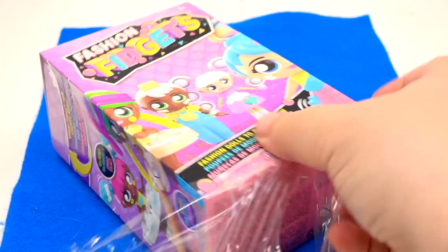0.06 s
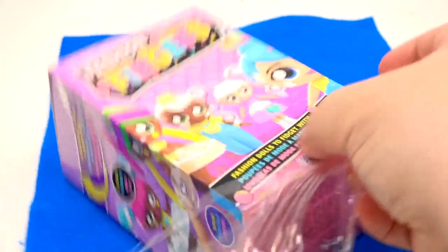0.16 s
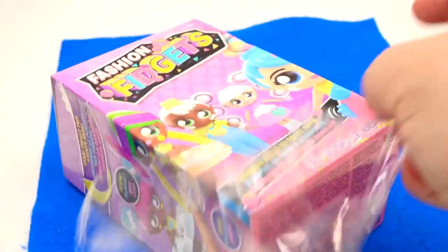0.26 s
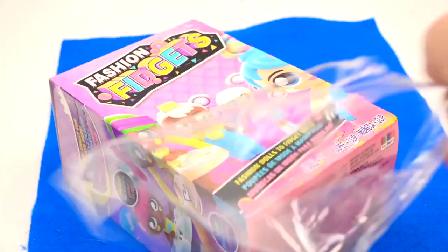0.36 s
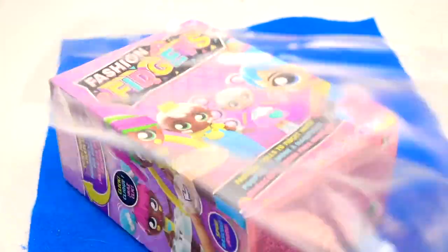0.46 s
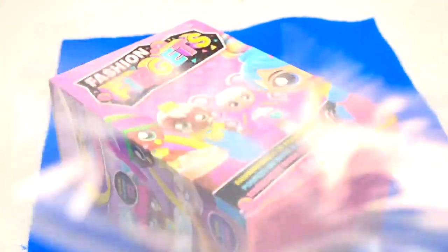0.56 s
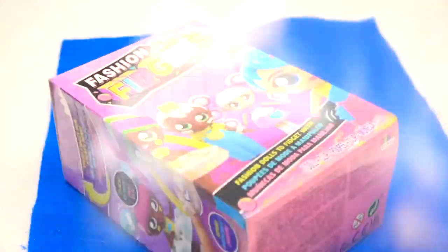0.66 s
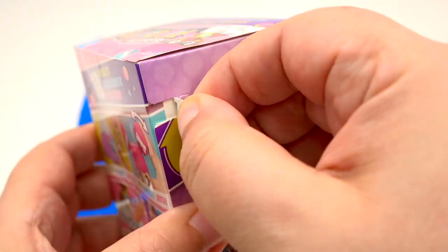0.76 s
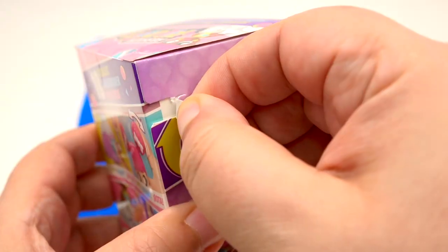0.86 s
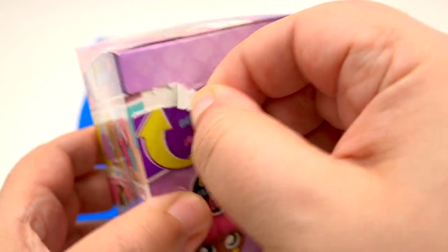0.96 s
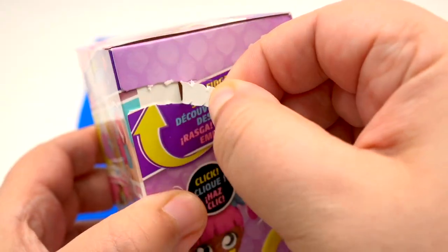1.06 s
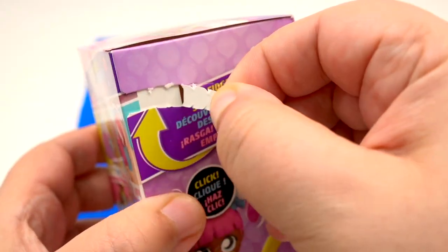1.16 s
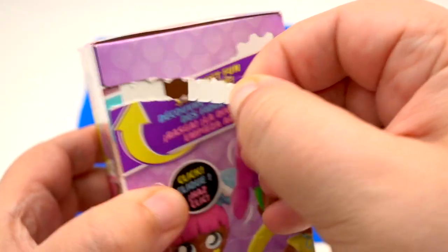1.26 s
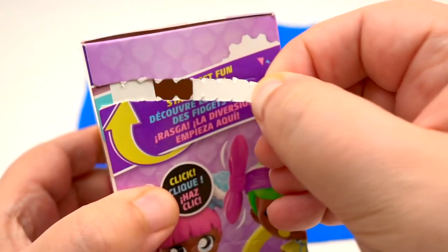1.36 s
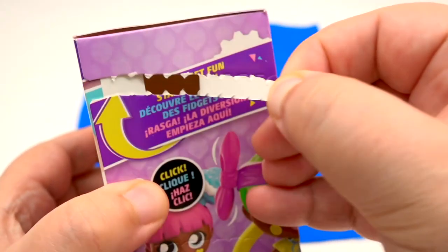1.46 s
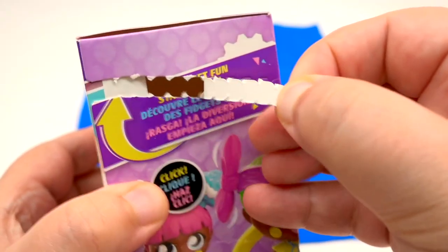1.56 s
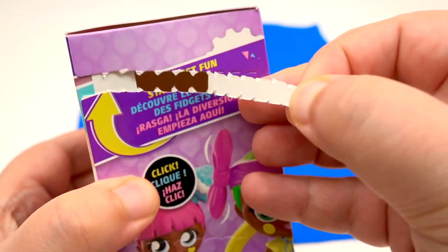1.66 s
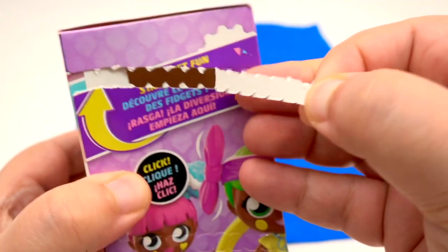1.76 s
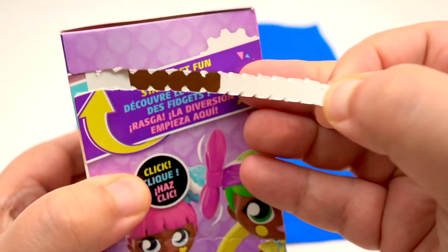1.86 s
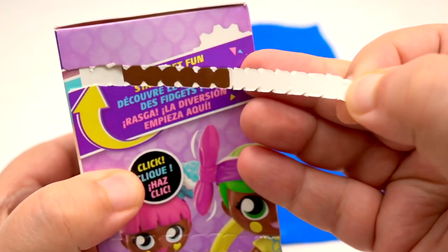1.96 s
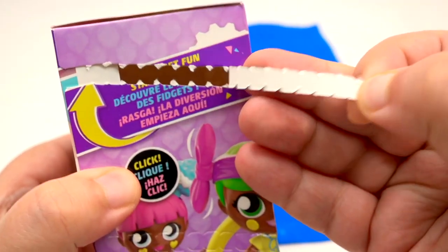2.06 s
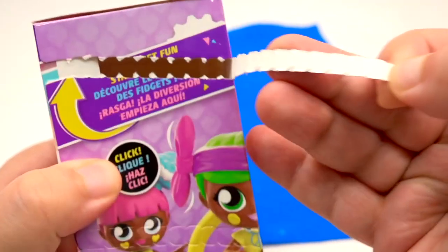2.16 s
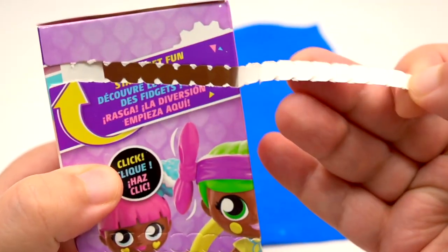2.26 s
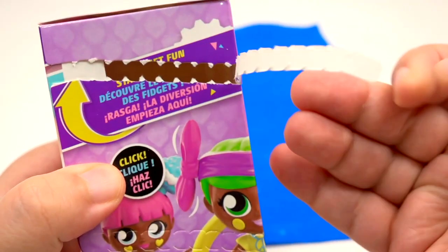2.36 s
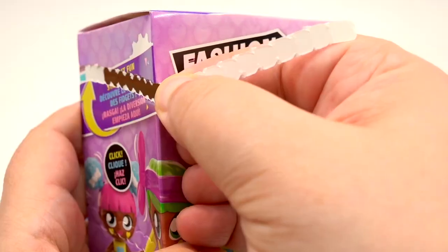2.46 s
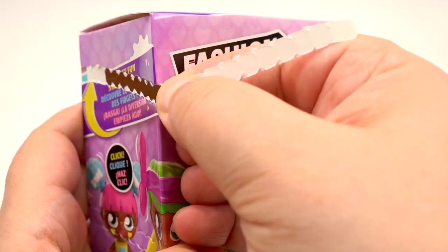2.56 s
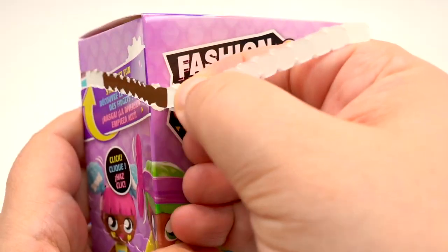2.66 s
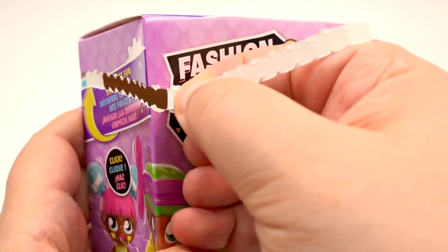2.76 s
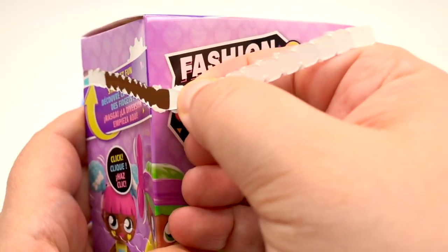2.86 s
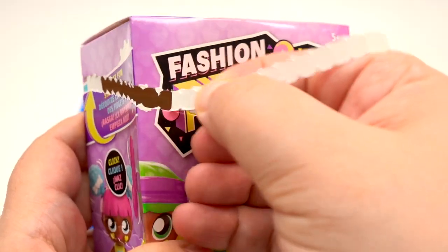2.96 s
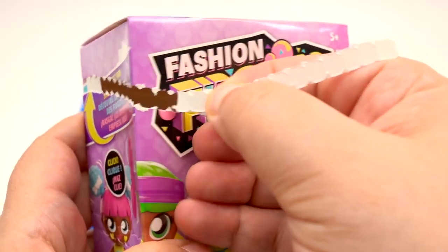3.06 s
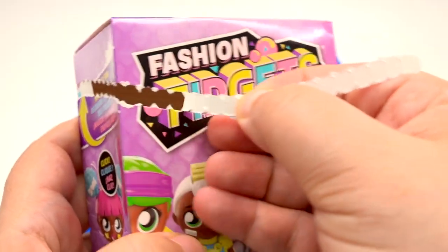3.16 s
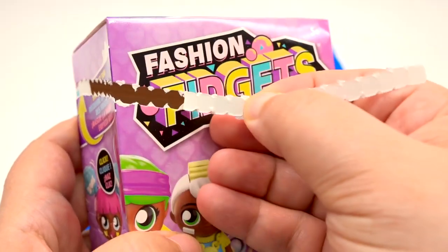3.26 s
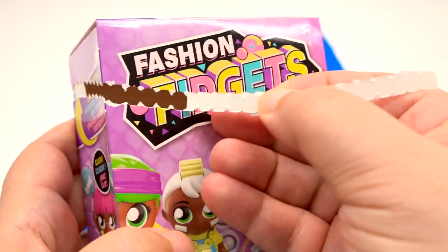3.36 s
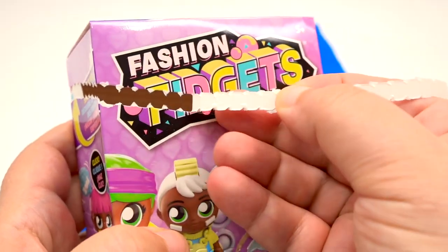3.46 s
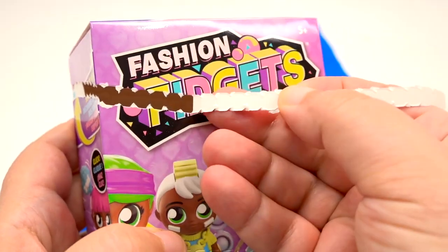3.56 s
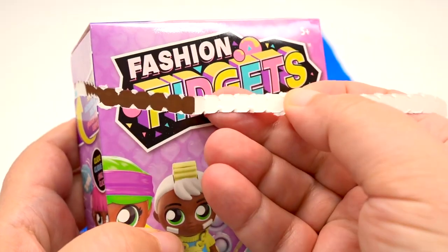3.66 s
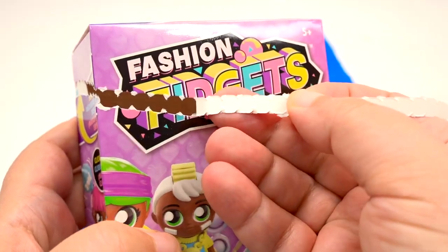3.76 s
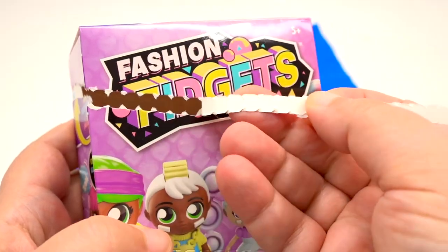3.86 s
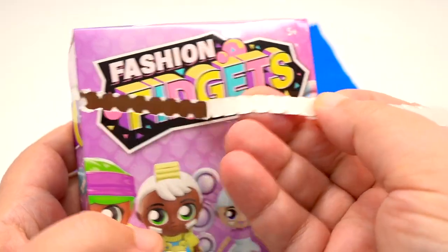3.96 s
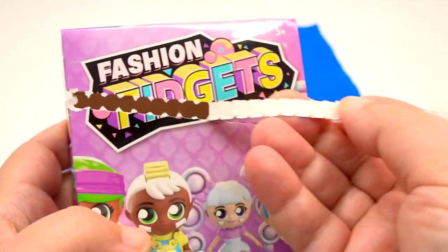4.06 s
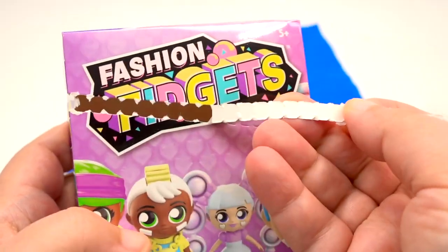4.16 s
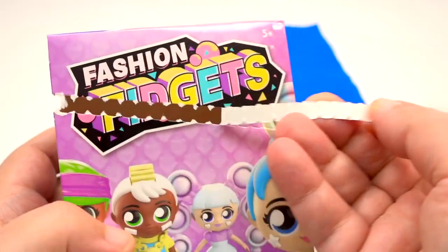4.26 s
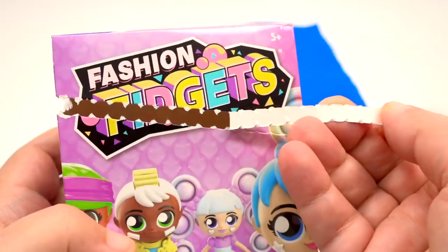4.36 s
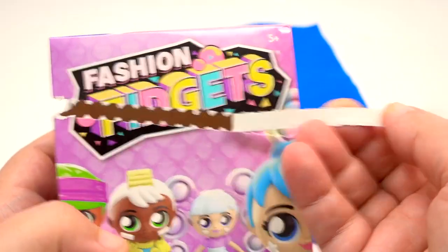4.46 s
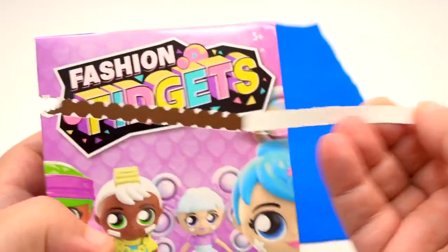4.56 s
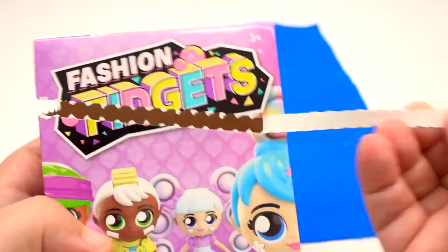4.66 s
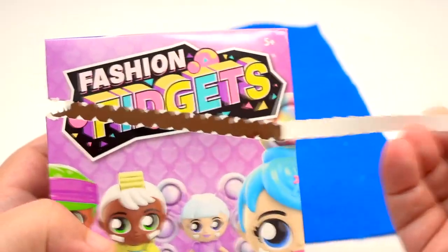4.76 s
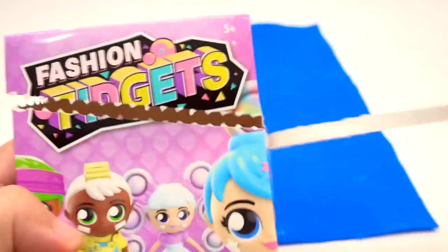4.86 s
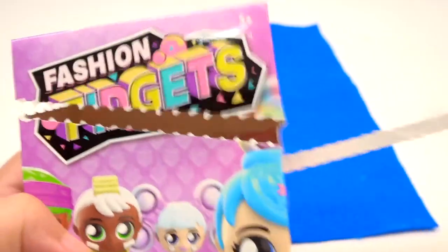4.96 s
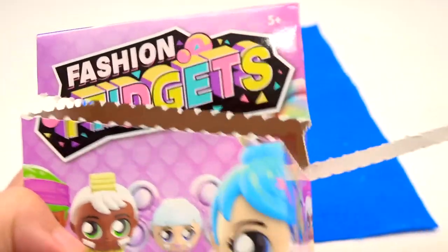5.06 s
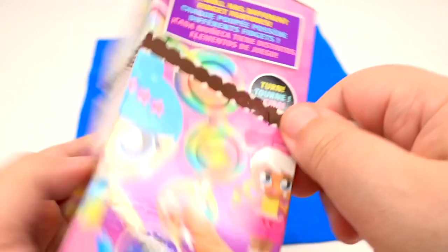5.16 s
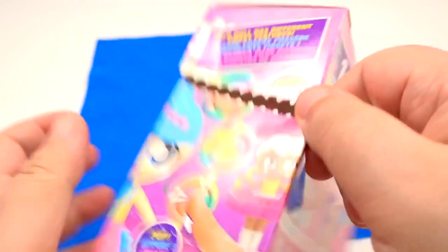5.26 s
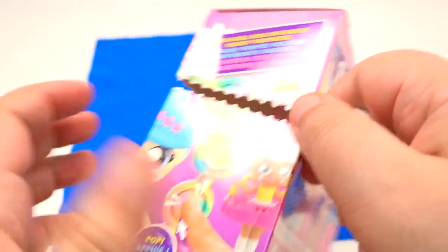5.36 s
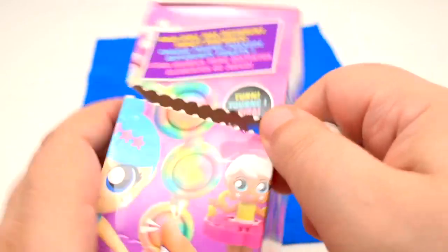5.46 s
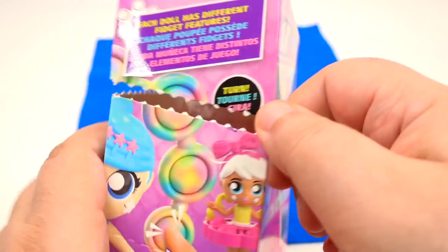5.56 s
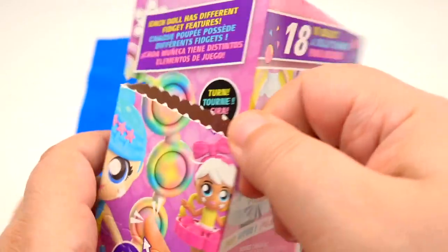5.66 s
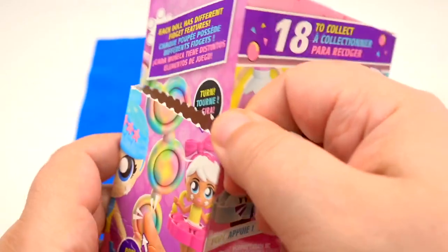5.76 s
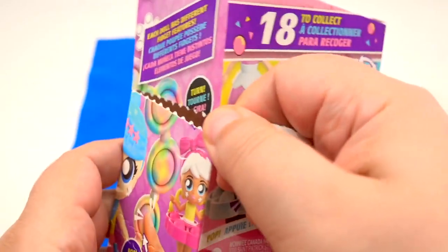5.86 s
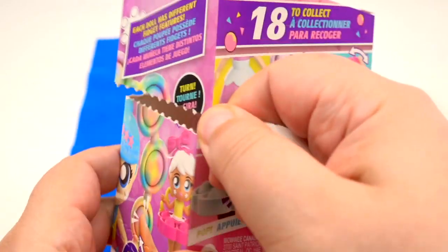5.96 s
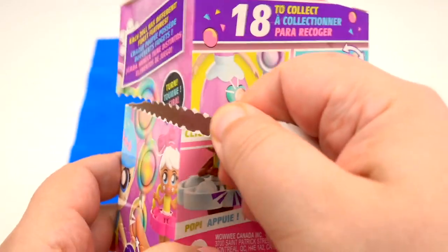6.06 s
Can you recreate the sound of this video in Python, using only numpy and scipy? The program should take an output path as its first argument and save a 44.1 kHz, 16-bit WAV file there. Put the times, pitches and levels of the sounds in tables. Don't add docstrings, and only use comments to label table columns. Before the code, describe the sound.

Close, detailed stereo in a small quiet room, with soft air hush and a low distant fan hum. From 0 to 0.75 seconds thin plastic film slides and crinkles brightly, its creases popping, with a harder burst near 0.6. From 0.8 to 2.15 a perforated card strip is pulled: separate sharp snaps, uneven in spacing, each ringing the small box's panels and hollow, with fibre crackle and brief twangs of the freed strip. A lull with a faint shift and knock follows until a short rub and snaps at 2.6. Tearing resumes around 2.9 to 3.4, pauses, then continues from 3.7 in firmer, boxier cracks. At 4.7 to 4.95 the snaps merge into a fast, resonant rip. A hollow knock lands near 5.3 as the box turns, then light finger slides and rustles, quieter. From 5.9 to about 6.1 a last few crisp snaps break out.

```python
import sys
import numpy as np
from scipy import signal
from scipy.fft import rfft, irfft, next_fast_len
from scipy.io import wavfile
from scipy.ndimage import uniform_filter1d, minimum_filter1d, map_coordinates

SR = 44100
rng = np.random.default_rng(int(sys.argv[2]) if len(sys.argv) > 2 else 0)


def attenuation_scalar(level_db):
    decades = np.asarray(level_db, float) / 20
    return 10 ** decades


def output_pcm(signal):
    pcm = np.clip(np.atleast_2d(signal).T, -1, 1) * 32767
    wavfile.write(sys.argv[1], SR, np.round(pcm).astype(np.int16))


N = 269892

# frequency in Hz, level in dB per Hz.
AIR_COLOUR = [(13, -45), (22, -5), (48, -8.5), (130, -1), (207, 1.5), (332, -4), (476, -9), (1060, -6.5),
              (2310, -23.5), (5160, -24.5), (6430, -40), (14000, -32), (15200, -44), (16500, -70)]
# frequency in Hz, width in Hz, level in dB.
FAN_HUM = (124.2, 19.4, -50.5)
AIR_DB, SWAY_DB = -50.5, 2.5
QUIET_DB, QUIET_ENDS_S = -8, .6

# frequency in Hz, level in dB per Hz.
FILM_COLOUR = [(530, -16), (900, -10), (1160, -8), (1670, 0), (5320, 1.5), (7950, -4), (10400, -12.5),
               (15000, -16), (15900, -24), (16500, -52)]
# frequency in Hz, level in dB per Hz.
FIBRE_COLOUR = [(880, -18), (1500, -9.5), (2050, -10.5), (3180, -10.5), (7250, -17), (8510, -18.5),
                (10800, -30), (15750, -31.5), (16050, -65), (16500, -79)]
# frequency in Hz, level in dB per Hz.
TICK_COLOUR = [(2500, -24), (4500, -3), (6500, 3), (9500, 3), (11000, -25), (15700, -20), (16200, -60)]
# frequency in Hz, width in Hz, level in dB.
PANEL_MODES = [(660, 130, 4), (880, 106, 7), (1020, 88, 3), (1200, 78, 2), (1368, 80, 1.5), (1533, 90, 1),
               (1680, 120, 0.5)]
# frequency in Hz, width in Hz, level in dB.
HOLLOW_MODES = [(205, 380, -27), (264, 57.6, -0.5), (348, 51, 3), (450, 63, 2)]
# frequency in Hz, width in Hz, level in dB.
LID_MODES = [(1550, 100, 2), (3600, 850, -6)]
LID_DB, LID_LOOSE_S = 4, 5.975

# time in seconds, crackle in dB.
FILM_SLIDE = [
    (.017, -40),
    (.03, -30.5),
    (.16, -35),
    (.2, -32),
    (.41, -25.5),
    (.51, -34.5),
    (.59, -45),
    (.63, -19),
    (.78, -47),
]
FILM_GONE_S, FILM_PANEL_DB, FILM_HOLLOW_DB = .78, -13.5, -19
# start in seconds, crack peak in dB, length in ms.
CREASE_POPS = [(0.0247, -20.5, 5.5), (0.04, -12, 3), (0.0954, -25.5, 4.1), (0.13, -23.5, 2.7),
               (.1371, -28, 3.1), (0.1705, -25, 5.8), (0.179, -20, 3), (0.1967, -22.5, 4.3),
               (.2155, -26, 2), (0.2318, -30, 6), (0.2422, -14, 1.6), (0.2982, -20, 1.2), (.3085, -30, 2.5),
               (0.0328, -23, 1.5), (0.051, -24, 2), (.271, -27, 3), (.362, -25, 4.5), (.38, -24, 5.7),
               (.417, -21, 3.8), (0.426, -30, 4), (0.4627, -25, 3.2), (0.326, -32, 2.9), (0.3919, -19, 8.5),
               (0.4044, -18.5, 13), (0.442, -40, 2), (0.467, -21, 1.3), (0.4829, -19.5, 5.3),
               (0.4945, -20, 1.5), (0.541, -26.5, 6.5), (0.603, -19, 6.5), (.618, -15.5, 1.9),
               (0.623, -23, 8.3), (.633, -9.5, 2.3), (0.7178, -26, 3.9)]
POP_PANEL_DB, POP_HOLLOW_DB = -12, -44

# start in seconds, peak in dB, pitch in Hz.
KNOCK_EVENTS = [(0.169, -40, 277), (1.717, -25.5, 360), (2.089, -20.5, 420), (2.104, -26.5, 452),
                (2.143, -33, 450), (2.272, -39, 364), (2.306, -36.5, 365), (2.733, -41, 343),
                (3.779, -22.5, 263), (3.745, -30, 400), (3.98, -26, 333), (3.996, -22, 263),
                (4.179, -23, 259), (4.469, -25, 205), (4.866, -20, 295), (5.282, -18, 468),
                (5.478, -35, 510), (5.653, -30.5, 238)]

# start in seconds, peak in dB, pitch in Hz.
STRIP_TWANGS = [(0.2966, -8.5, 5280), (0.4612, -11.5, 4880), (0.5386, -19, 6020), (0.9079, -10.5, 2220),
                (1.1941, -12.5, 2140), (1.2595, -13.5, 2260), (1.4279, -19, 3160), (1.8843, -6.5, 2770),
                (1.9877, -17.5, 2280), (2.1021, -13.5, 3300), (2.6109, -11, 2480), (3.1362, -10.5, 5420),
                (3.2851, -11, 5050), (3.7434, -8.5, 2220), (4.2095, -20, 3420), (4.3067, -10, 4130),
                (4.6476, -15, 4100), (4.7325, -12.5, 3080), (4.7803, -8.5, 3820), (4.818, -11.5, 3270),
                (4.9207, -12, 3150), (4.9353, -8.5, 3270), (5.978, -12.5, 4280)]
TWANG_DB, TWANG_MS, TWANG_ROUGH = -7.5, 1.35, 0.78

# start in seconds, crack peak in dB, panels in dB above it, panel pitch in Hz.
BRIDGE_SNAPS = [(.6039, -25.5, -6, 880), (.7969, -13, -6.5, 1270), (.9085, -15.5, -1, 866),
                (.9409, -19, -9, 900), (.9498, -14, -6.5, 880), (.9553, -15.5, -13, 1300),
                (1.1461, -30.5, -3.5, 880), (1.1947, -16.5, -5, 1330), (1.2601, -17, -9, 1680),
                (1.4157, -11.5, -2.5, 910), (1.4285, -17, -5, 1340), (1.5114, -32.5, -2, 1700),
                (1.5666, -14.5, -5.5, 1280), (1.5727, -14, -25, 1760), (1.7156, -11, -3.5, 910),
                (1.843, -24.5, -18, 840), (1.8837, -19, 4, 890), (1.8931, -53, 1, 880),
                (1.988, -20.5, -24, 1550), (2.0402, -21, 3.5, 850), (2.0458, -8.5, -6.5, 1340),
                (2.0558, -18, 3, 815), (2.0912, -18, 3, 1320), (2.103, -11.5, -4, 615),
                (2.1413, -35, 3, 880),
                (2.604, -17.5, -5, 1870), (2.6111, -10.5, -23, 1980), (2.871, -32, -6, 900),
                       (2.9169, -28, 9, 920), (2.9288, -10, -6, 880), (3.016, -23, -2, 930),
                       (3.0217, -13, -12.5, 880), (3.051, -21.5, 4.5, 1510), (3.0557, -21, 3, 1010),
                       (3.0647, -30.5, 9, 1350), (3.126, -24, 5, 1390), (3.1365, -19.5, 5.5, 890),
                       (3.1486, -29.5, 10, 1080), (3.1614, -25, 1, 764), (3.1882, -27, 6, 1140),
                       (3.2869, -23, 8, 1154), (3.313, -23.5, 3, 1220), (3.376, -14.5, -3, 990),
                       (3.3861, -32.5, 10.5, 1610), (3.53, -31.5, -9, 1190), (3.6398, -35, -6, 880),
                       (3.6623, -34.5, -1.5, 1220),
                (3.7444, -15.5, -2, 1300), (3.7767, -16.5, 2, 1020), (3.9491, -22.5, -7, 1000),
                        (3.952, -15, -4, 985), (3.9802, -10, -11, 1810), (3.9978, -14, -4, 970),
                        (4.0475, -24.5, -5.5, 1760), (4.081, -35, -8, 1650), (4.097, -35.5, -2, 1760),
                        (4.166, -20, 3, 1600), (4.1814, -17.5, 2.5, 1020), (4.2096, -14, -7, 1530),
                        (4.2285, -11.5, -2.5, 990), (4.3024, -26, 7, 1730), (4.3079, -17.5, -1, 956),
                        (4.4685, -15, 4, 880), (4.5122, -20.5, 4, 850), (4.5214, -25.5, 13, 870),
                        (4.5647, -14.5, 4, 770), (4.6215, -19.5, 3, 765), (4.6446, -23.5, 4.5, 1020),
                        (4.6496, -18.5, -1, 1020), (4.6966, -32, 9.5, 760),
                (4.7287, -22.5, 6, 1100), (4.7334, -20, 9.5, 1103), (4.7645, -26, 1, 950),
                     (4.7764, -21, 0, 1850), (4.7815, -19.5, 4.5, 970), (4.8009, -25, 15, 930),
                     (4.806, -23, 10.5, 910), (4.8176, -23.5, 11, 900), (4.8299, -25, 12, 916),
                     (4.8439, -24, -4, 970), (4.8534, -18, 5, 1330), (4.8585, -26, 11, 910),
                     (4.865, -19, 12.5, 1020), (4.8828, -17, -7, 780), (4.8885, -26.5, 12.5, 830),
                     (4.898, -30, 14, 940), (4.9094, -25.5, 8, 1450), (4.9147, -23.5, 7, 934),
                     (4.922, -14.5, 8, 960), (4.9336, -21.5, 5, 1420), (4.941, -28.5, 11, 1140),
                     (4.95, -35, 11, 1480), (4.973, -34, 12.5, 1430), (5.0202, -40, 9, 1270),
                (5.113, -31.5, -1.5, 916), (5.2838, -23, 10.5, 736), (5.306, -29, 2, 930),
                (5.478, -30.5, 3, 1120), (5.626, -55, -4, 1030), (5.6519, -48, 15, 960),
                (5.9283, -16, -3, 1340), (5.9791, -14, -2, 1550), (6.002, -24, -3, 1510),
                (6.044, -28, -8, 1590), (6.056, -16.5, -1.5, 1590)]
SNAP_MS, MS_PER_DB = 2.33, .05
# time in seconds, hollow in dB above the crack.
HAND_GRIP = [(.62, 5), (.8, -21), (.95, -5.5), (1.45, -1.5), (2.05, -8), (2.15, 9.5), (2.6, -7.5),
             (2.9, -46), (3.35, -18), (3.7, -1), (4.2, -6.5), (4.5, 0), (4.75, 5.5), (4.95, 4.5),
             (5.15, -44), (5.3, 11.5), (5.5, -20), (5.95, -13)]
FRAY_DB, STRAIN_S, SETTLE_S, FRAY_PANEL_DB = -15, 0.0029, 0.0051, -1

# start in seconds, crackle in dB, hold in seconds, panels in dB above it.
STRIP_PULLS = [(0.804, -39.5, 0.024, -7), (0.928, -30, 0, -2.5), (1.188, -31, 0.026, -1.5),
               (1.26, -35.5, 0.039, -6), (1.417, -42, 0.043, 6.5), (1.559, -33.5, 0.03, -5),
               (1.716, -31, 0.0056, 2), (1.86, -39, 0.018, -1), (1.882, -30, 0.0017, -0.5),
               (2.053, -39.5, 0.082, 4), (2.63, -56, 0.039, -14), (4.3, -53, 0, 3), (2.909, -30, 0.049, -2),
               (3.03, -37.5, 0.13, -5), (3.12, -32.5, 0.069, -1.5), (3.275, -31, 0.097, 2),
               (3.52, -64, 0.23, 3), (3.731, -43, 0, -8), (3.75, -35.5, 0, 2), (3.791, -31.5, 0, 3),
               (3.932, -50, 0.059, 8), (3.945, -35.5, 0.026, -3), (4.175, -43, 0.14, -5),
               (4.457, -37, 0, 3), (4.504, -35.5, 0.016, 11), (4.567, -36, 0.023, 7),
               (4.615, -51, 0.099, 4), (4.763, -31.5, .17, 6), (5.293, -48.5, 0.15, 4.5),
               (5.915, -46, 0, 2), (5.981, -34, 0.038, -1)]
# start in seconds, crackle in dB, hold in seconds, panels in dB above it.
FINGER_SLIDES = [
    (2.598, -27.5, 0.012, -6),
    (2.304, -55, 0.013, 7),
    (5.105, -45, 0.07, -1),
    (5.464, -33, 0.033, -11),
    (5.524, -42.5, 0.027, -5),
    (5.658, -45, 0.047, 1),
    (5.776, -47.5, 0.024, 0),
    (5.856, -52.5, 0.025, 3),
]
RISE_S, RISE_DB = 0.0056, 7.5
FADE_DB_PER_S, STOP_DB_PER_S = 189, 456
REST_DB, REST_HOLLOW_DB = -60, -56.5
GRIP_SHARE, RUB_HOLLOW_DB = 0.43, -6.5

# start in seconds, peak in dB, pitch in Hz.
PALM_THUDS = [(.625, -46, 62.3), (2.1, -52, 60), (2.74, -53, 70), (2.93, -52, 55), (3.36, -46, 55),
              (3.87, -52, 60), (4.51, -54, 59.5), (4.79, -42, 70), (4.95, -57, 51), (5.285, -43, 75),
              (6.05, -47, 83), (5.282, -21.5, 250), (5.296, -27, 245), (5.283, -32, 150), (1.416, -21, 328),
              (1.567, -23, 334), (2.112, -27, 440), (2.125, -32, 450), (2.158, -31, 440)]
THUD_CYCLES = 1.45

# start in seconds, peak in dB.
GLOSS_TICKS = [(1.015, -37.5), (1.165, -35.5), (1.363, -40), (1.688, -40), (2.811, -55), (2.863, -43),
               (3.0631, -20.5), (3.194, -22), (2.274, -47.5), (2.33, -51), (2.53, -55), (3.584, -47),
               (3.61, -47), (3.37, -41), (3.055, -28), (4.512, -38), (4.523, -25), (4.881, -23),
               (5.305, -38), (5.7148, -41), (5.862, -49), (5.986, -26)]
TICK_MS, TICK_BOX_DB = 0.44, -40

# frequency in Hz, time to fall 60 dB in seconds.
ROOM_DECAY = [(200, 0.22), (1400, 0.13), (4000, 0.26), (10000, 0.23)]
# frequency in Hz, left minus right in dB.
STEREO_LEAN = [(60, 1.8), (180, 3), (550, 2.1), (1650, .5), (5000, .6), (9000, 1), (15000, .2)]
# frequency in Hz, side level in dB.
STEREO_SPREAD = [(60, -24), (400, -16), (2400, -19), (4800, -19), (6200, -7), (9000, 1), (11800, 0),
                 (13500, -16)]
TOP_HZ = 16200


def unit(x):
    return x / np.sqrt(np.mean(x ** 2) + 1e-20)


def along(points, hz):
    f, value = np.transpose(points)
    return np.interp(np.log(hz + 1), np.log(f + 1), value)


def curve(rows):
    s, value = np.transpose(rows)
    return np.interp(np.arange(N) / SR, s, value)


def filtered(x, response):
    size = next_fast_len(N + SR // 2)
    hz = np.fft.rfftfreq(size, 1 / SR)
    return irfft(rfft(x, size) * response(hz), size)[..., :N]


def coloured(x, spectrum):
    return filtered(x, lambda hz: attenuation_scalar(along(spectrum, hz)))


def ringing(modes):
    def response(f):
        total = 0
        for k, (hz, width, db) in enumerate(modes):
            damped = 1j * f * width
            total = total + (-1) ** k * attenuation_scalar(db) * damped / (hz * hz - f * f + damped)
        return total
    return response


def grains(per_second, spread_db, clump_db):
    size_db = spread_db * np.minimum(rng.exponential(size=N), 3)
    breaks = (rng.random(N) < per_second / SR) * rng.standard_normal(N) * attenuation_scalar(size_db)
    clumps = map_coordinates(rng.standard_normal(N // 150 + 4), [np.arange(N) / 150])
    return breaks * attenuation_scalar(clump_db * clumps)


def creased(x, patchy_db):
    z = signal.stft(x, nperseg=128)[2]
    field = uniform_filter1d(rng.standard_normal(z.shape), size=4, axis=0)
    field = uniform_filter1d(field, size=3, axis=1)
    return signal.istft(z * attenuation_scalar(patchy_db * unit(field)), nperseg=128)[1][:N]


def modes_struck(modes, t, scatter_db, damping):
    luck = rng.standard_normal((len(modes), 2))
    ring = np.zeros(len(t))
    for (hz, width, db), (strength, shift) in zip(modes, luck):
        level_db = db + scatter_db * strength - 27 * damping * width * t
        ring += attenuation_scalar(level_db) * np.sin(2 * np.pi * hz * (1 + .015 * shift) * t)
    ring = ring * (1 - np.exp(-t / 0.0039))
    return ring / np.abs(ring).max()


def swell(last):
    return last * np.exp(1 - last)


def snaps(events, material, burst_db):
    t = np.arange(SR // 14) / SR
    burst, box = np.zeros((2, N + len(t)))
    for s, db, panel_db, hollow_db, *panel_hz, ms in events:
        at = round((s - .0006) * SR)
        span = slice(at, at + len(t))
        rough_db = 2.0 * rng.standard_normal(len(t) // 12 + 1).repeat(12)[:len(t)]
        jagged = rng.standard_normal(len(t)) * attenuation_scalar(rough_db)
        crack = swell(t / (0.00057 * ms)) * jagged
        panels = [(hz, 70, 7) for hz in panel_hz] + PANEL_MODES
        burst[span] += attenuation_scalar(db) * crack / np.sqrt(uniform_filter1d(crack ** 2, size=40).max())
        box[span] += attenuation_scalar(db + panel_db + 2.5) * modes_struck(panels, t, scatter_db=3, damping=2.3)
        box[span] += attenuation_scalar(db + hollow_db - 3) * modes_struck(HOLLOW_MODES, t, scatter_db=4, damping=1.6)
    return attenuation_scalar(burst_db - 3) * coloured(creased(burst[:N], patchy_db=2), material) + box[:N]


def air():
    where = [[np.zeros(N), np.ones(N)], [np.arange(N) / 8000] * 2]
    sway = map_coordinates(rng.standard_normal((2, N // 8000 + 4)), where)
    hum_hz, hum_width, hum_db = FAN_HUM
    hush = unit(coloured(rng.standard_normal(N), AIR_COLOUR)) * attenuation_scalar(SWAY_DB * sway[0])
    hum = unit(filtered(rng.standard_normal(N), ringing([(hum_hz, hum_width, 0)]))) * attenuation_scalar(SWAY_DB * sway[1])
    quiet = attenuation_scalar(QUIET_DB * (np.arange(N) < QUIET_ENDS_S * SR))
    return (attenuation_scalar(AIR_DB) * hush + attenuation_scalar(hum_db) * hum) * quiet


def tearing():
    crackle_gain, panel_gain, hollow_gain = pulling()
    film = unit(coloured(creased(grains(4000, spread_db=2.2, clump_db=2.2), patchy_db=3), FILM_COLOUR))
    card = unit(coloured(creased(grains(9000, spread_db=2.5, clump_db=2.5), patchy_db=2.5), FIBRE_COLOUR))
    crackle = np.where(np.arange(N) < FILM_GONE_S * SR, film, card)
    rub = grains(4000, spread_db=1.5, clump_db=3.5)
    panels = unit(filtered(rub, ringing(PANEL_MODES)))
    hollow = unit(filtered(rub, ringing(HOLLOW_MODES)))
    lid = unit(filtered(rub, ringing(LID_MODES))) * (np.arange(N) > LID_LOOSE_S * SR)
    crackle = crackle + attenuation_scalar(LID_DB) * lid
    return attenuation_scalar(-4.0) * (crackle_gain * crackle + panel_gain * panels + hollow_gain * hollow)


def pulling():
    t = np.arange(N) / SR
    crackle, panels = np.full((2, N), attenuation_scalar(REST_DB))
    strokes = [(*row, FADE_DB_PER_S) for row in STRIP_PULLS]
    strokes += [(*row, STOP_DB_PER_S) for row in FINGER_SLIDES]
    for s, db, hold, panel_db, fade in strokes:
        rise_db = np.minimum(RISE_DB * ((t - s) / RISE_S - 1), 0)
        shape_db = rise_db - fade * np.maximum(t - s - RISE_S - hold, 0)
        crackle = crackle + attenuation_scalar(db + shape_db)
        panels = panels + attenuation_scalar(db + panel_db + shape_db)
    fray = fraying()
    crackle = crackle + fray
    panels = panels + attenuation_scalar(FRAY_PANEL_DB) * fray
    hollow = crackle * attenuation_scalar(RUB_HOLLOW_DB + GRIP_SHARE * curve(HAND_GRIP)) + attenuation_scalar(REST_HOLLOW_DB)
    film = attenuation_scalar(curve(FILM_SLIDE)) * attenuation_scalar([[0], [FILM_PANEL_DB], [FILM_HOLLOW_DB]])
    return np.where(t < FILM_GONE_S, film, [crackle, panels, hollow])


def pops():
    events = [(s, db, POP_PANEL_DB, POP_HOLLOW_DB, ms) for s, db, ms in CREASE_POPS]
    return snaps(events, FILM_COLOUR, burst_db=4.0)


def knocks():
    t, out = np.arange(SR // 5) / SR, np.zeros(N + SR // 5)
    for s, db, hz in KNOCK_EVENTS:
        modes = [(hz, 60, 9), (1.42 * hz, 120, 0)] + HOLLOW_MODES
        out[round(s * SR):][:len(t)] += attenuation_scalar(db + 6.5) * modes_struck(modes, t, scatter_db=3.0, damping=1.04)
    return out[:N]


def twangs():
    t, out = np.arange(SR // 30) / SR, np.zeros(N + SR // 30)
    envelope = swell(t / (TWANG_MS / 1000))
    for s, db, hz in STRIP_TWANGS:
        drift = TWANG_ROUGH * np.cumsum(rng.standard_normal(len(t))) / np.sqrt(SR / hz)
        out[round(s * SR):][:len(t)] += attenuation_scalar(db + TWANG_DB) * envelope * np.sin(2 * np.pi * hz * t + drift)
    return out[:N]


def bridges():
    rows = BRIDGE_SNAPS
    events = []
    for s, db, panel_db, hz in rows:
        hollow_db = np.interp(s, *np.transpose(HAND_GRIP))
        ms = SNAP_MS * np.exp(MS_PER_DB * np.clip(panel_db, -15, 6))
        events.append((s, db, panel_db, hollow_db, hz, ms))
    return events


def fraying():
    lag, out = np.arange(-SR // 20, SR // 10) / SR, np.zeros(N)
    for s, db, *_ in bridges():
        out[round(s * SR)] = attenuation_scalar(db + FRAY_DB)
    shape = np.exp(np.where(lag < 0, lag / STRAIN_S, -lag / SETTLE_S))
    return np.abs(signal.fftconvolve(out, shape)[SR // 20:][:N])


def thuds():
    t, out = np.arange(SR // 4) / SR, np.zeros(N + SR // 4)
    for s, db, hz in PALM_THUDS:
        envelope = swell(t * hz / THUD_CYCLES)
        out[round(s * SR):][:len(t)] += attenuation_scalar(db) * envelope * np.sin(2 * np.pi * hz * t)
    return out[:N]


def ticks():
    events = [(s, db, TICK_BOX_DB, TICK_BOX_DB, TICK_MS) for s, db in GLOSS_TICKS]
    return snaps(events, TICK_COLOUR, burst_db=10.5)


def room(x, pieces=20):
    out, step = np.zeros(N + SR), N // pieces + 1
    for at in range(0, N, step):
        hz, t, z = signal.stft(rng.standard_normal(SR // 3), SR, nperseg=256)
        decay = attenuation_scalar(-60 * t / along(ROOM_DECAY, hz)[:, None])
        tail = signal.istft(z * decay, SR, nperseg=256)[1]
        wet = signal.fftconvolve(x[at:at + step], tail / np.linalg.norm(tail))
        out[at + 200:][:len(wet)] += wet
    return out[:N]


def side_port(mid):
    z = signal.stft(mid, nperseg=128)[2]
    turn = uniform_filter1d(rng.standard_normal(z.shape), size=3, axis=1)
    scattered = signal.istft(z * np.exp(4j * unit(turn)), nperseg=128)[1][:N]
    return coloured(scattered, STEREO_SPREAD)


def scene():
    near = pops() + snaps(bridges(), FIBRE_COLOUR, burst_db=15.0)
    near = near + knocks() + tearing() + twangs() + ticks()
    near = filtered(near, lambda hz: (1j * hz / (60 + 1j * hz)) ** 2)
    mid = near + attenuation_scalar(-6) * room(near) + air() + thuds()
    side = side_port(mid)
    halves = np.array([[.5], [-.5]])
    return filtered(np.array([mid + side, mid - side]), lambda hz: attenuation_scalar(halves * along(STEREO_LEAN, hz)))


def low_pass(x):
    return signal.sosfilt(signal.butter(12, 16800, fs=SR, output="sos"), x)


def record(dry):
    need = np.minimum(1, attenuation_scalar(-6.5) / (np.abs(dry).max(0) + 1e-9))
    gain = uniform_filter1d(minimum_filter1d(need, size=129), size=65)
    mix = filtered(dry * gain, lambda hz: hz < TOP_HZ)
    return low_pass(mix)


dry = scene()
out = record(dry)
output_pcm(out)
```